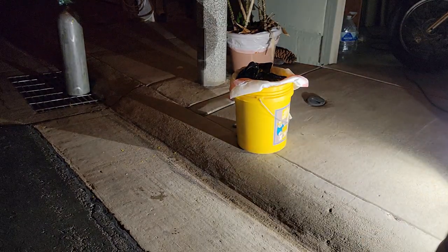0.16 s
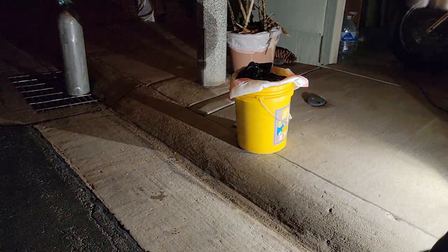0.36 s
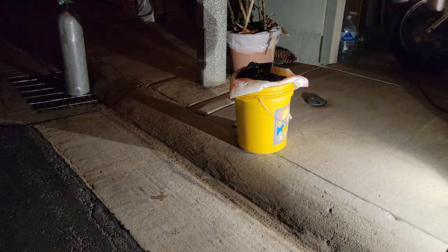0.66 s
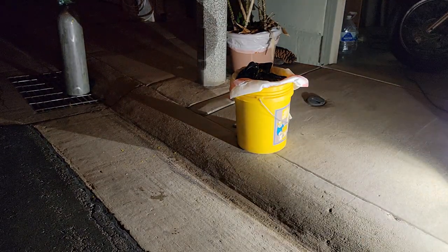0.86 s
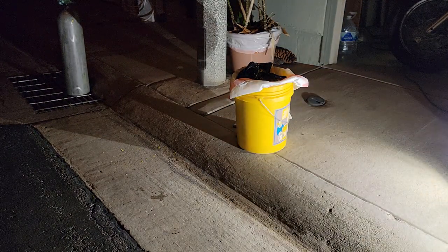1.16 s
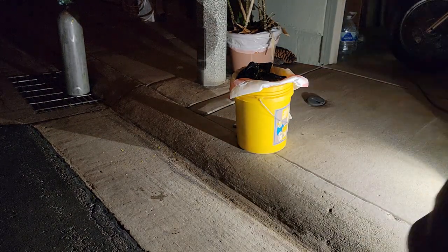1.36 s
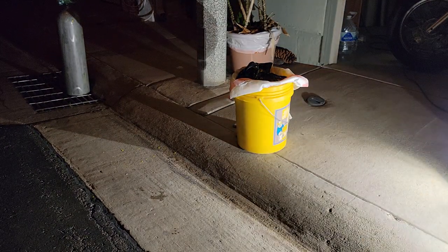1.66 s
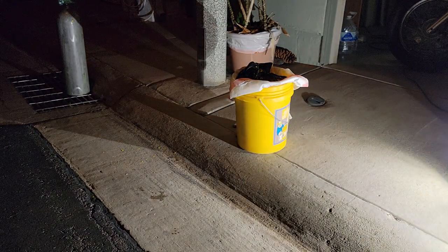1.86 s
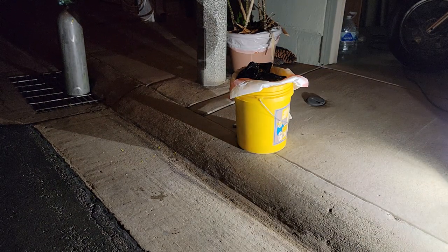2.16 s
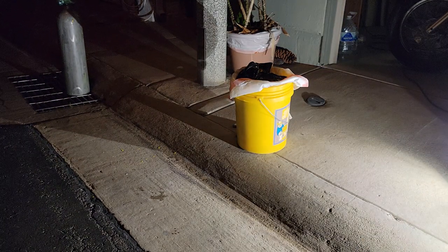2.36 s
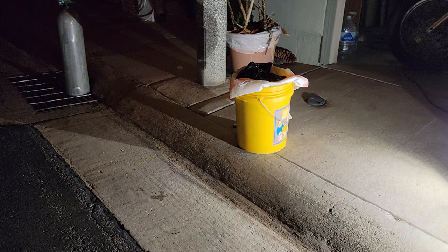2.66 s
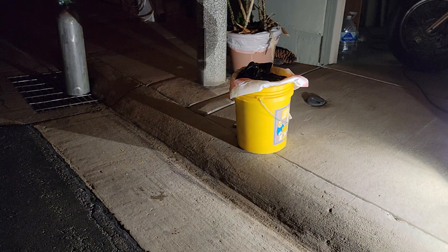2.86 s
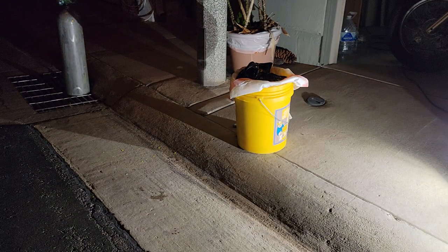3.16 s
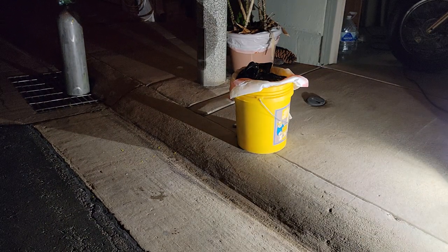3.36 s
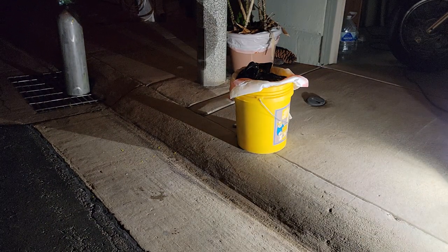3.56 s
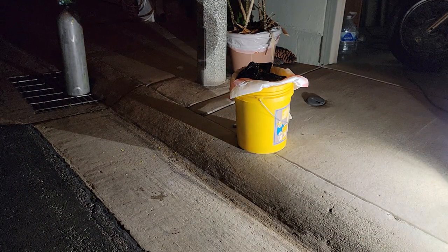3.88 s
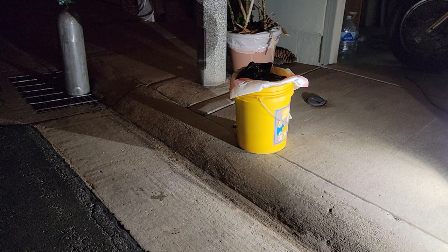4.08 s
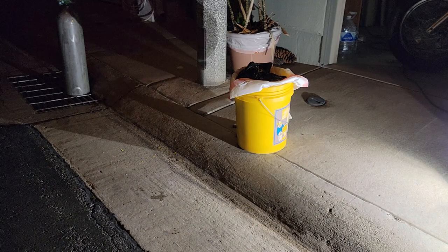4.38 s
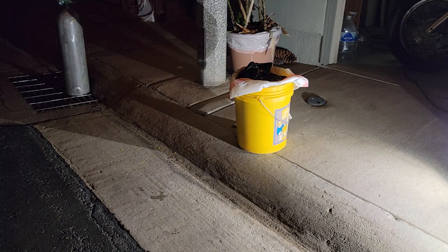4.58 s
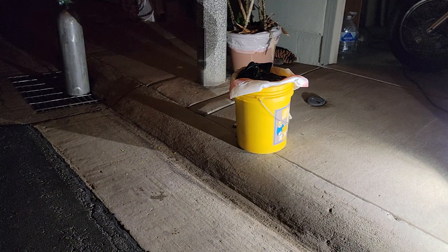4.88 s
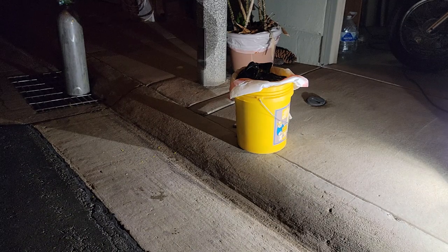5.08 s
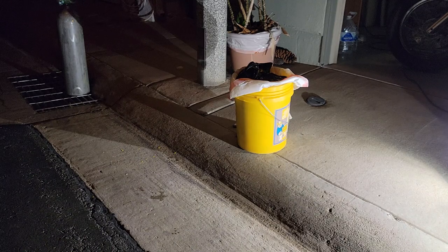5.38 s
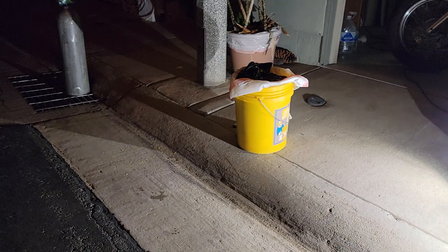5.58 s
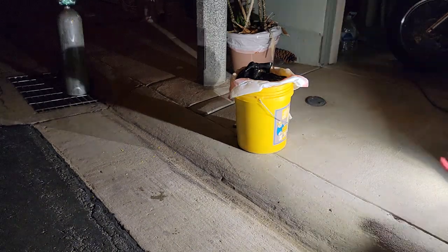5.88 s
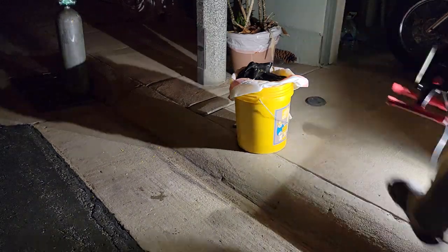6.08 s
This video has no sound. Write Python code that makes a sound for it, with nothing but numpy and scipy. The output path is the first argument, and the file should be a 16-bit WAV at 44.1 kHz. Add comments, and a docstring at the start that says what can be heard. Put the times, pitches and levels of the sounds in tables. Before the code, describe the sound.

In a concrete yard at night, a plastic pail thuds down hard with a hollow boom and gritty crunch, rocks, then is set down again. Its loose handle clacks and ticks into stillness. Crickets chirp quickly throughout over a soft low town rumble. Near the end comes one short, dry, hollow knock to the right. The stereo microphone is close, with short echoes off the house fronts.

```python
"""A concrete yard at night: a plastic pail is set down twice, a little to the right; it booms, rocks, settles.
Blows excite damped modes and crack grit; shaped noise makes the rubs; snaps and modes make the handle clack.
Later comes one dry knock, and filtered noise tails echo it all off the house fronts.
Two crickets chirp in falling whistles, the near one wavering but quickening on the whole.
Behind them lie a far noise-band chorus, a low sine hum, thin hiss and the noise rumble of the town."""
import sys
import numpy as np
from scipy import signal
from scipy.fft import rfft, irfft
from scipy.io import wavfile

SR = 44100
rng = np.random.default_rng(int(sys.argv[2]) if len(sys.argv) > 2 else 0)


def generate_wav(signal):
    """Clip the signal to [-1, 1] and save it as 16-bit WAV at the path in sys.argv[1]."""
    frames = np.transpose(np.atleast_2d(signal))
    scaled = np.clip(frames, -1, 1) * 32767
    pcm = np.round(scaled).astype(np.int16)
    wavfile.write(sys.argv[1], SR, pcm)


N = 274743
T = np.arange(N) / SR  # scene time, s
AGE = T[:SR]  # time since a sound began, s


def undb(db):
    """Decibels to gain."""
    return 10 ** (np.asarray(db) / 20)


def curve(points, at):
    """A two-column table read at given positions."""
    return np.interp(at, *np.transpose(points))


def across(points, size):
    """A table of (Hz, value) read at every frequency of a sound of this size."""
    hz, value = np.transpose(points)
    bins_hz = np.arange(size // 2 + 1) * SR / size
    return np.interp(np.log(bins_hz + 1), np.log(hz), value)


def noise(points, size, likeness=0., tilt_db=0.):
    """Stereo noise of rms 1 with a given spectrum, tilt per octave and left-right correlation."""
    mid, side = rfft(rng.standard_normal((2, size)))
    likeness = np.clip(likeness, -1, 1)
    opposite = np.array([[1], [-1]])
    pair = np.sqrt(1 + likeness) * mid + np.sqrt(1 - likeness) * side * opposite
    tilted = [(hz, db + tilt_db * np.log2(hz)) for hz, db in points]
    x = irfft(pair * undb(across(tilted, size)), size)
    return x / x.std()


def fade(t60):
    """Exponential decay, followed for one second."""
    return np.exp(-np.log(1000) * AGE / max(t60, 1e-4))


def burst(t60):
    """A contact builds over a fraction of a millisecond, then dies away."""
    return fade(t60) * (1 - np.exp(-(AGE / .0003) ** 2))


def ring(modes):
    """Damped modes (Hz, dB, t60 in s) struck once."""
    return sum(undb(db) * fade(t60) * np.sin(2 * np.pi * hz * AGE) for hz, db, t60 in modes)


def add(out, x, s, lag, right_db=0):
    """Place a sound: it reaches the left ear lag samples late, and the right ear right_db louder."""
    x = np.broadcast_to(x, (2, x.shape[-1]))
    for ear, late, db in ((0, lag, -right_db / 2), (1, 0, right_db / 2)):
        i = max(int(s * SR) + int(round(late)), 0)
        part = out[ear, i:i + x.shape[1]]
        part += undb(db) * x[ear, :len(part)]


def radiate(x, lowest_hz, order):
    """A small object cannot radiate long waves."""
    return signal.sosfilt(signal.butter(order, lowest_hz, "high", fs=SR, output="sos"), x)


# Colour of the town's rumble. Each row: frequency in Hz, relative level in dB.
RUMBLE_SPECTRUM = [(12, -61), (20, -24), (32, -20.5), (46, -10), (65, 1.5), (92, -9), (125, -6.5),
                   (147, -12), (195, -14.5), (386, -19), (537, -19), (839, -24.5), (5500, -50.5),
                   (7150, -69.5), (12100, -120)]
# Stereo width of the rumble. Each row: frequency in Hz, left-right correlation from -1 to 1.
RUMBLE_LIKENESS = [(60, 0.92), (130, 0.96), (290, 0.51), (640, -0.51), (1400, -0.7), (3100, -0.03),
                   (7000, 0.14)]


def rumble(level_db=-47):
    """Many distant town sources blur into broad, mostly low noise."""
    return undb(level_db) * noise(RUMBLE_SPECTRUM, N, across(RUMBLE_LIKENESS, N))


# The low hum and its octave. Each row: frequency in Hz, rms level in dB.
HUM_TONES = [(59.2, -61.5), (118.4, -60.5)]


def hum():
    """Two steady sines an octave apart, each with a random starting phase."""
    return sum(undb(db) * np.sqrt(2) * np.sin(2 * np.pi * (hz * T + rng.random())) for hz, db in HUM_TONES)


# Colour of the thin hiss. Each row: frequency in Hz, relative level in dB.
HISS_SPECTRUM = [(3000, -7), (5000, 1.5), (8000, 3), (10500, -6.5), (13000, -0.5), (16000, -11.5)]


def hiss(level_db=-78):
    """Faint, steady treble noise."""
    return undb(level_db) * noise(HISS_SPECTRUM, N)


# Band of the insects, also the rasp in a chirp. Each row: frequency in Hz, relative level in dB.
INSECT_SPECTRUM = [(5500, -35), (6100, -14.5), (6450, -6), (6750, -2), (7050, -0.5), (7300, -15),
                   (7650, -16), (8300, -35)]


def chorus(level_db=-64.5):
    """Far insects blend into a steady band of noise."""
    return undb(level_db) * noise(INSECT_SPECTRUM, N)


def cricket(pace, level_db, lag, count):
    """Chirps of a few wing strokes, each a short falling whistle, on average louder than the one before."""
    stroke_s, period_s = .0145, .0192
    start_hz, end_hz, detune = 7400, 6600, .0068  # detune: random spread as a fraction of pitch
    scatter_db, swell_db, rasp = 2.1, 1, .23  # random spread, rise per stroke, noise gain
    out, u = np.zeros((2, N)), np.linspace(0, 1, int(stroke_s * SR))
    chirps_so_far = np.floor(np.cumsum(pace) / SR)
    for i in np.flatnonzero(np.diff(chirps_so_far, prepend=-1)):
        for k in range(count):
            loud, sharp = rng.standard_normal(2)
            hz = (start_hz + (end_hz - start_hz) * u ** 1.3) * (1 + detune * sharp)
            whistle = np.sin(2 * np.pi * np.cumsum(hz) / SR) + rasp * noise(INSECT_SPECTRUM, len(u))
            stroke_db = level_db[i] + swell_db * k + scatter_db * loud
            stroke = undb(stroke_db) * np.sin(np.pi * u) ** 2 * whistle
            add(out, stroke, T[i] + k * period_s - stroke_s / 2, lag, right_db=-4)
    return out


# The near cricket's pace. Each row: time in seconds, chirps per second.
NEAR_PACE = [(0, 7.19), (.8, 8.52), (1.2, 7.78), (1.6, 8.78), (2.3, 8.48), (3.1, 9.1), (3.7, 8.75),
             (4.6, 9.36), (5.6, 8.66)]
# The near cricket's loudness. Each row: time in seconds, level in dB.
NEAR_LEVEL = [(.3, -49), (1, -53.5), (2.6, -51), (4.2, -49), (6.2, -48.5)]


def crickets(far_pace=7.4, far_db=-56.5):
    """A near cricket and a fainter one each keep their own time, in chirps per second."""
    near = cricket(curve(NEAR_PACE, T), curve(NEAR_LEVEL, T), lag=2, count=2)
    far = cricket(np.full(N, far_pace), np.full(N, far_db), lag=3, count=3)
    return near + far


# The pail's wall slides and rustles. Each row: middle in seconds, half length in seconds, level in dB.
RUB_EVENTS = [(0.416, 0.021, -53), (0.478, 0.0041, -30), (0.514, 0.022, -25.5), (.554, 0.021, -32),
              (.67, .027, -40.5), (1.754, .012, -37.5), (1.794, 0.0092, -33), (2.368, 0.041, -55),
              (2.757, 0.087, -58.5), (3.048, 0.076, -67), (4.649, 0.14, -66.5)]


def rubs(catch_db=4, catch_s=0.0045, skirt_db=-14):
    """Sliding plastic catches and slips, so its hiss comes in tiny bursts around a wall resonance."""
    wall_hz, width_octaves = 2577, .3  # width at -30 dB
    widens_db = 6  # a touch this much lighter is twice as wide, up to the limit below
    out = np.zeros((2, N))
    for s, half_s, db in RUB_EVENTS:
        octaves = min(width_octaves * 2 ** ((-30 - db) / widens_db), 1.1)
        band = [(wall_hz * 2 ** (k * octaves), skirt_db * abs(k) ** 1.8) for k in range(-2, 3)]
        band = [(band[0][0] / 2, -90)] + band + [(band[-1][0] * 2, -90)]
        marks = np.arange(0, 1, catch_s)
        catches = np.interp(AGE, marks, undb(catch_db * rng.standard_normal(len(marks))))
        swell = np.exp(-((AGE - .5) / half_s) ** 2)
        rub = undb(db) * swell * catches / catches.mean() * noise(band, SR, likeness=0.37)
        # the swell peaks half a second in, so an early rub loses its silent start
        skip = max(int((.5 - s) * SR), 0)
        add(out, rub[:, skip:], max(s - .5, 0), lag=2)
    return out


# The pail meets the concrete. Each row: start in seconds, push in dB, contact in milliseconds,
# crack level in dB, crack tilt in dB per octave.
PAIL_BLOWS = [(0.4483, -47, .5, -33.5, -5), (0.4629, -44, .5, -34.5, 1.5), (.4751, -23, .5, -13, -4.5),
              (0.4801, -5.5, 1.33, -27.5, -6), (0.4901, -27, 0.68, -20, -0.5), (0.5061, -11, 0.42, -9, -3),
              (0.514, -27, 0.68, -20, -11), (0.527, -37.5, .4, -18.5, -0.5), (0.6323, -22, 0.59, -17.5, -4),
              (0.6363, -15, 1.3, -22, -4), (.678, -38.5, 0.2, -40, -4.5), (1.36, -13.5, 3.4, -49, -0.5),
              (1.367, -22.5, 0.17, -10.5, 0), (1.537, -30, 0.83, -23, 2), (1.5432, -25, 1.07, -44.5, 4),
              (1.553, -35.5, 0.32, -21.5, -6), (1.6367, -40, 0.907, -39.5, 1),
              (1.678, -33, 1.7, -35.5, -0.5)]
# The hollow body, its base and its wall. Each row: frequency in Hz, relative level in dB, t60 in seconds.
BODY_MODES = [(94.4, -14, 0.4), (214.8, -2, 0.36), (239.7, -3, .13), (272, -12.5, .11),
              (338.5, -18.5, 0.39), (475, -18, 0.078), (510, -16.5, .11), (586, -10.5, 0.11),
              (603.3, 1, 0.15), (773, -21, .11), (809, -17.5, 0.12), (948, -23, 0.082), (1017, -22, .55),
              (1197, -13.5, .1), (1300, -20.5, 0.11), (1512, -15.5, 0.12), (1735, -16.5, .15),
              (2090, -22.5, .17), (2343, -16, 0.16), (2650, -18, .18), (2800, -25.5, 0.11),
              (3050, -20.5, .13)]
# Colour of a crack, also of the knock's tick. Each row: frequency in Hz, relative level in dB.
CRACK_SPECTRUM = [(150, -15), (500, -8), (900, -5.5), (1500, -1.5), (2800, -5.5), (3800, -15), (5500, -18),
                  (8000, -23.5), (11000, -38.5), (15500, -33)]


def pail(shove_db=-3, grit_likeness=0.42, lowest_hz=68, spot_db=6.0):
    """Each blow pushes the body into its modes; grit under the base cracks and crunches."""
    crack_t60_s, crack_doubles_db = .047, 29.5  # t60 at -20.5 dB; a crack this much louder lasts twice as long
    out = np.zeros((2, N))
    for s, push_db, contact_ms, crack_db, tilt_db in PAIL_BLOWS:
        contact_s = contact_ms / 1000
        force = np.sin(np.pi * np.minimum(AGE / contact_s, 1))
        # every spot on the base favours other wall modes; the spread grows with pitch up to 2 kHz
        modes = [(hz, db + spot_db * min(hz / 1000, 2) * rng.standard_normal(), t60)
                 for hz, db, t60 in BODY_MODES]
        # a longer contact reaches only the low modes
        boom = signal.fftconvolve(ring(modes), force / force.sum())[:SR]
        # the base flexes in and out once and shoves the air
        shove = np.sin(2 * np.pi * np.minimum(AGE / (2 * contact_s), 1))
        crack_t60 = crack_t60_s * 2 ** ((crack_db + 20.5) / crack_doubles_db)
        crack = noise(CRACK_SPECTRUM, SR, grit_likeness, tilt_db) * burst(crack_t60)
        blow = undb(push_db) * (boom + undb(shove_db) * shove) + undb(crack_db) * crack
        add(out, blow, s, lag=3)
    return radiate(out, lowest_hz, order=4)


# Rim and handle clacks. Each row: start in seconds, level in dB, contact pitch in Hz, relative snap in dB.
HANDLE_CLACKS = [(0.5056, 1.5, 980, -21), (1.367, -4.5, 1546, -6), (1.3662, -9.5, 3350, -1),
                 (1.7402, -18, 2580, -9), (1.7423, -7.5, 2810, -19), (1.7684, -17, 2300, -17.5),
                 (1.8096, 0.5, 1000, -18), (1.9348, -26, 1300, -15), (1.957, -10.5, 940, -30),
                 (1.9663, -17.5, 2250, -31), (2.3123, -11, 1620, -25), (2.32, -18.5, 1890, -4),
                 (2.3309, -12.5, 2110, -0.5), (2.3315, -13, 3210, -12.5), (2.405, -23, 1410, -31),
                 (2.431, -29.5, 1300, -25), (2.516, -36.5, 1490, -21), (2.6738, -18.5, 2270, -7.5),
                 (2.7811, -17, 2220, -7), (2.816, -28.5, 2340, 2), (3.365, -50, 2980, -14.5),
                 (3.734, -41.5, 3340, -20), (5.674, -42, 2580, -10.5)]
# The handle's ring. Each row: frequency in Hz, relative level in dB, t60 in seconds.
HANDLE_RING = [(1570, -2, 0.067), (1996, -4.5, 0.22), (2120, -10, 0.33), (2360, -12.5, 0.13),
               (2763, -1.5, 0.05), (2840, -9, .08), (3450, -19, 0.28), (4120, -16.5, 0.3),
               (4370, -20.5, 0.17), (5210, -19.5, 0.0766)]
# Colour of the loose handle's chatter. Each row: frequency in Hz, relative level in dB.
CHATTER_SPECTRUM = [(400, -7), (1200, -9), (2200, 5.5), (3100, 3.5), (3700, -3.5), (4200, -6.5),
                    (4800, -17), (5500, -6.5), (6400, -19), (8000, -19), (10800, -25), (13000, -21.5),
                    (16000, -29)]
# The handling moves to the right. Each row: time in seconds, samples by which the left ear lags.
HANDLE_PATH = [(.5, 2), (1.75, 3.4), (2, 6.3)]


def handle(lowest_hz=380, rise_cycles=0.25):
    """Hard plastic clacks: a snap, a few cycles at the contact, brief chatter and the handle's ring."""
    snap_hz, snap_t60, snap_rise_s = 5400, .003, .00012
    tick_hz, tick_db = 12700, -17
    glint_db, glint_t60 = -23.5, .033  # the snap leaves a thin ring
    # a sharper contact is higher, rings more cycles and shakes the handle harder:
    # values at 2 kHz and their change per octave
    cycles_2k, cycles_octaves = 10.3, 2.45
    chatter_2k_db, chatter_db_per_octave, chatter_t60 = -12.5, 10, .028
    ring_2k_db, ring_db_per_octave = -29, 2.5
    out, tone = np.zeros((2, N)), ring(HANDLE_RING)
    for s, db, hz, snap_db in HANDLE_CLACKS:
        sharp = np.log2(hz / 2000)  # octaves above 2 kHz
        cycles = cycles_2k * 2 ** (cycles_octaves * sharp)
        contact = ring([(hz, 0, cycles / hz)]) * (1 - np.exp(-AGE * hz / rise_cycles))
        snap_modes = [(snap_hz, snap_db, snap_t60), (tick_hz, snap_db + tick_db, snap_t60),
                      (snap_hz, snap_db + glint_db, glint_t60)]
        snap = ring(snap_modes) * (1 - np.exp(-AGE / snap_rise_s))
        chatter = noise(CHATTER_SPECTRUM, SR, likeness=0.55) * burst(chatter_t60)
        chatter = undb(chatter_2k_db + chatter_db_per_octave * sharp) * chatter
        rings = undb(ring_2k_db + ring_db_per_octave * sharp) * tone
        add(out, undb(db) * (contact + snap + chatter + rings), s, curve(HANDLE_PATH, s))
    return radiate(out, lowest_hz, order=2)


# The knock's short, hollow tones. Each row: frequency in Hz, relative level in dB, t60 in seconds.
HOLLOW_MODES = [(630, -27, 0.0083), (890, 0, 0.0087), (1050, 1.5, 0.012), (1230, 5, 0.017),
                (1375, -14, 0.013), (2560, -21.5, 0.011), (2820, -25, 0.013)]


def knock(start_s=5.3522, level_db=-9, rise_s=0.00088, tick_db=-33, tick_t60=.01):
    """One dry, hollow knock far to the right: heavily damped modes with a faint tick at the contact."""
    out = np.zeros((2, N))
    hollow = ring(HOLLOW_MODES) * (1 - np.exp(-(AGE / rise_s) ** 2))
    tick = undb(tick_db) * noise(CRACK_SPECTRUM, SR, likeness=0.83) * burst(tick_t60)
    add(out, undb(level_db) * (hollow + tick), start_s, lag=14, right_db=4.5)
    return out


# The yard's echo by band. Each row: lower edge in Hz, upper edge in Hz,
# level in dB of the tail before its band filter, t60 in seconds.
YARD_BANDS = [(62.9, 560, -19.5, 0.93), (355, 980, -9.5, 0.45), (1300, 3000, -10.5, 0.35),
              (3535, 5000, -7, 0.33), (8140, 12200, -8.5, .35)]


def yard(x, build_s=0.0052):
    """Scattered echoes off walls and posts, dying band by band."""
    echoes = rng.standard_normal((2, SR))
    response = 0
    for lo, hi, db, t60 in YARD_BANDS:
        tail = echoes * fade(t60) * (1 - np.exp(-(AGE / build_s) ** 2))
        tail = tail / np.sqrt(np.sum(tail ** 2) / 2)  # unit energy per ear
        band = signal.butter(2, [lo, hi], "band", fs=SR, output="sos")
        response = response + undb(db) * signal.sosfilt(band, tail)
    return signal.fftconvolve(x, response, axes=1)[:, :N]


# The pail stands to the right. Each row: frequency in Hz, right minus left in dB.
PAIL_BEARING = [(100, -0.5), (200, 0), (380, 13), (700, 0.5), (1300, 2.5), (2400, 1.5), (4400, 2.5),
                (8000, -1), (14000, 4.5)]


def scene(knock_room_db=-4):
    """The handling, the knock and their echo in the night air."""
    background = rumble() + hum() + hiss() + chorus() + crickets()
    handling = rubs() + pail() + handle()
    ear_share = np.array([[-.5], [.5]])
    handling = irfft(rfft(handling) * undb(across(PAIL_BEARING, N) * ear_share), N)
    dry_knock = knock()
    echo = yard(handling + undb(knock_room_db) * dry_knock)
    return background + handling + dry_knock + echo


def record(dry, top_hz=16100):
    """The recorder clips at full scale and cuts the top."""
    top_cut = signal.ellip(8, .2, 70, top_hz, fs=SR, output="sos")
    return signal.sosfilt(top_cut, np.clip(dry, -1, 1))


dry = scene()
out = record(dry)
generate_wav(out)
```